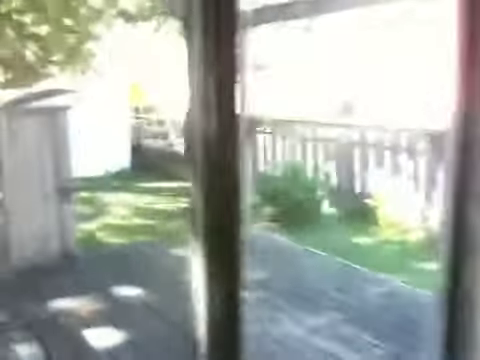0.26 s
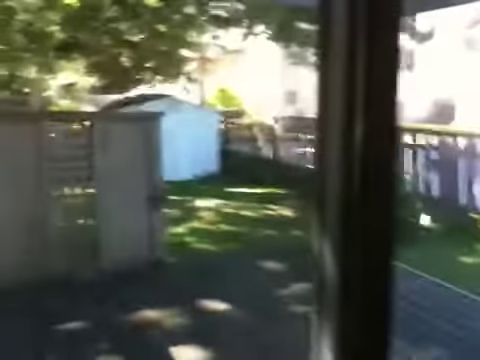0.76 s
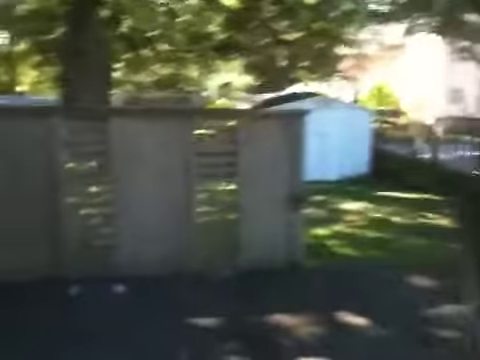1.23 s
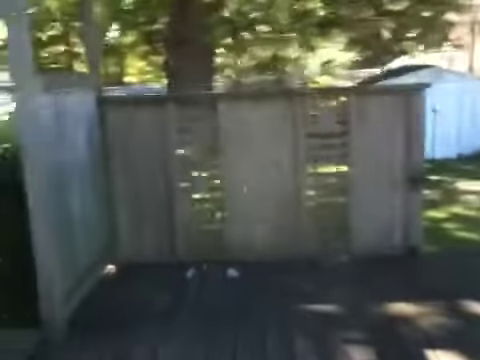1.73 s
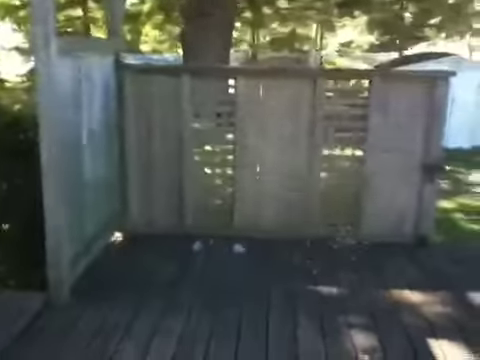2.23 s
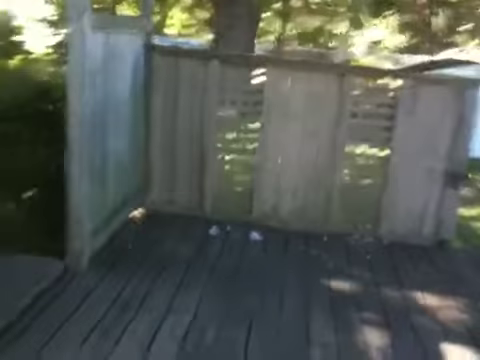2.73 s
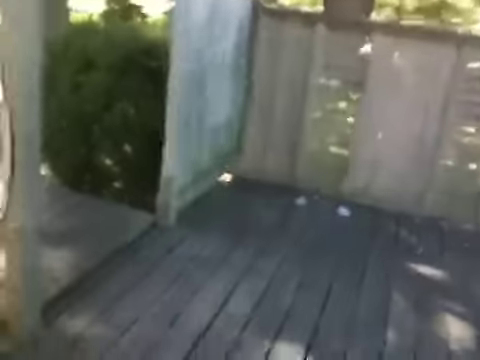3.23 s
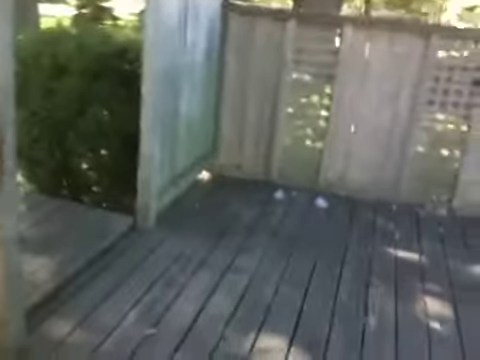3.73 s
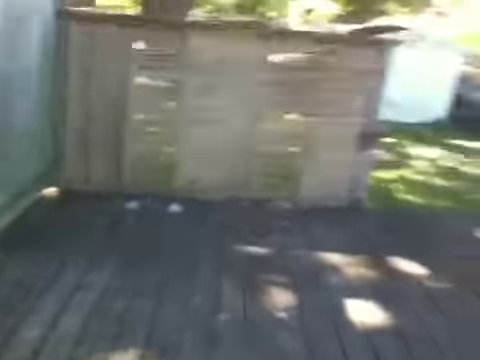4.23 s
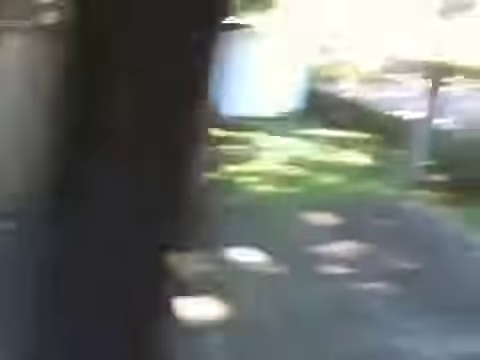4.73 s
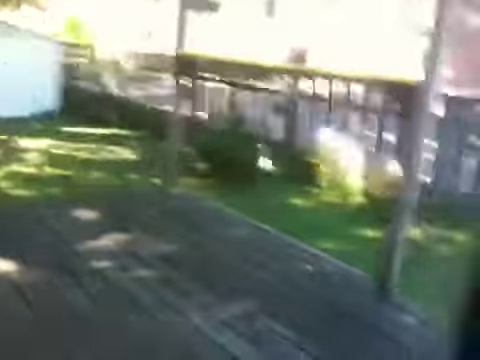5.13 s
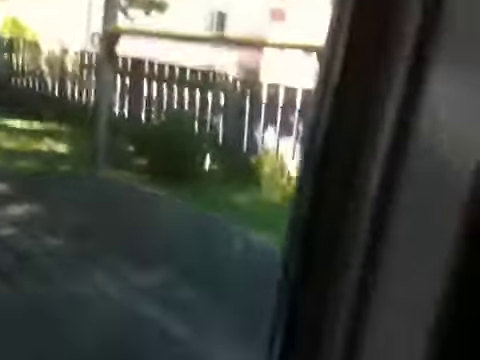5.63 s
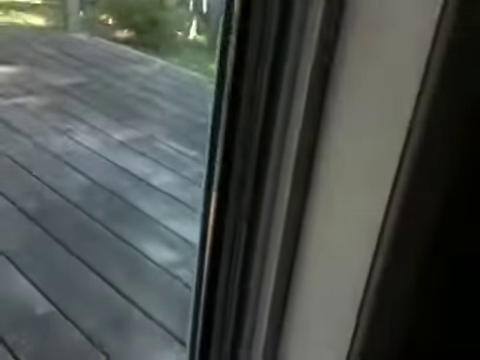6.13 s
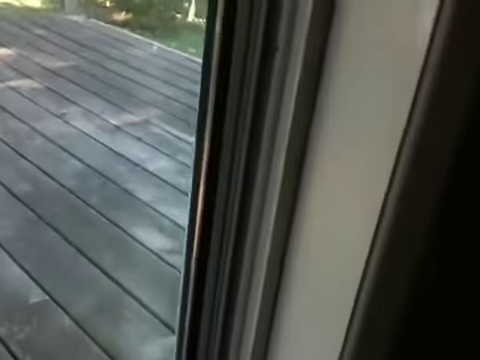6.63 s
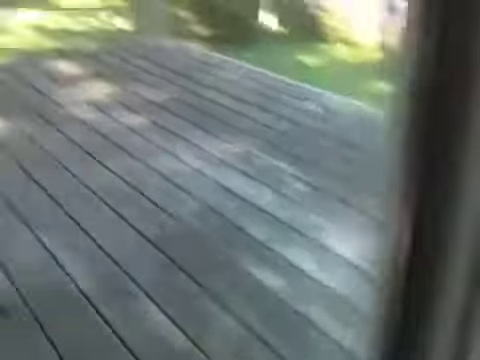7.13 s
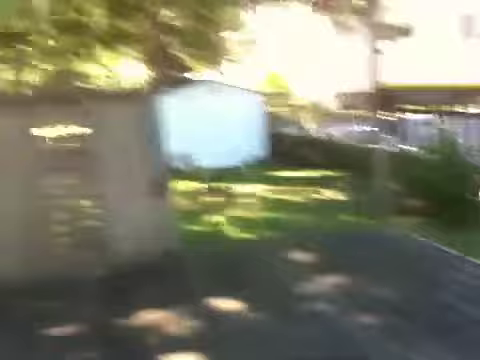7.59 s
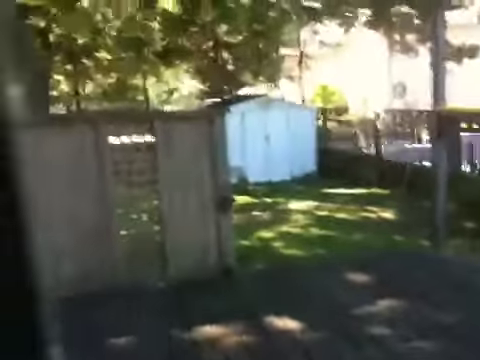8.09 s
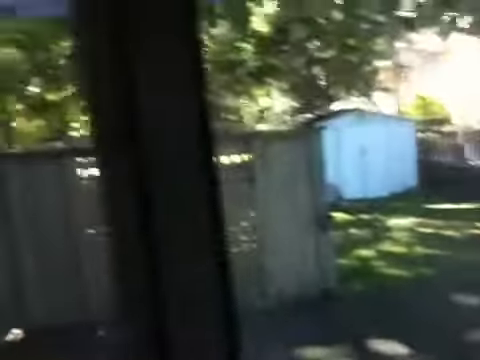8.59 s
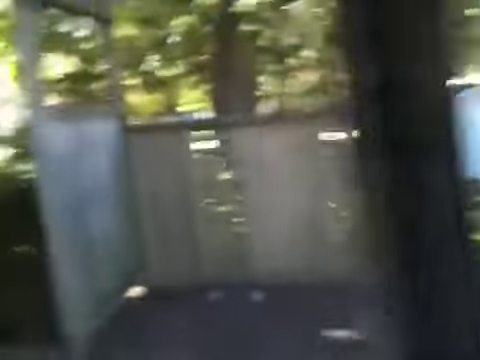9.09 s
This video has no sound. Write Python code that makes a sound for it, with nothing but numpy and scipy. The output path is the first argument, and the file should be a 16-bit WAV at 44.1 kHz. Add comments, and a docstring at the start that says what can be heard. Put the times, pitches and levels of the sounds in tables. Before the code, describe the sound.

A quiet beginning of cloth rustle breaks into clusters of dry clacks and thuds as a glass door's latch and frame are worked. A brief, bright skid of the sash rings its aluminium channel. Things calm to faint taps, then one strong clack rattles. Last, rollers rumble along a dirty track with hiss and two low swells. Close indoor sound with a short room tail.

```python
"""A faint shudder and rustle come first, then the latch and frame of a sliding glass patio door clack.
Filtered noise makes the background, and decaying noise bursts with wandering tones make the contacts.
Damped sagging tones make dull low thuds; the sash scrapes in its aluminium channel by dense random slips.
At the end the door rolls along its gritty track: droning panes, two low swells, crunching grains and hiss.
All is heard close to the microphone, in a small room."""
import sys
import numpy as np
from scipy import signal
from scipy.fft import rfft, irfft, next_fast_len
from scipy.io import wavfile
from scipy.ndimage import uniform_filter1d, map_coordinates

SR = 44100
rng = np.random.default_rng(int(sys.argv[2]) if len(sys.argv) > 2 else 0)


def generate_wav(sig):
    """Save sig (samples, or channels by samples) to the path in sys.argv[1] as 16-bit PCM at SR."""
    pcm = np.round(np.clip(np.atleast_2d(sig).T, -1, 1) * 32767).astype(np.int16)
    wavfile.write(sys.argv[1], SR, pcm)


N = 412335

# Modes of the glass panes. Each row: frequency in Hz, width in Hz, relative level in dB.
PANE_MODES = [(144.8, 9.2, -1.5), (165, 28, 1), (213.8, 9.6, 3), (249, 11, 2), (246, 52, -2),
              (303.7, 11, -6.5), (361.7, 17, -7), (445, 11, -20.5)]
# Resonances of the door frame. Each row: frequency in Hz, width in Hz, relative level in dB.
FRAME_MODES = [(457.6, 6.8, 2), (545, 13, 2.5), (1056, 15, -2.5), (1370, 24, -0.5), (1666, 27, 2),
               (1847, 16, -2), (2265, 21, 1.5), (2466, 18, 4), (3283, 25, -1), (3920, 34, 6), (5570, 60, 2),
               (7380, 150, 3.5)]


def amp(db):
    """Amplitude ratio: twenty decibels are a factor of ten."""
    return 10 ** (np.asarray(db) / 20)


def unit(x):
    """Normalisation: the signal is scaled to rms 1."""
    return x / np.sqrt(np.mean(x ** 2) + 1e-20)


def along(points, hz):
    """Logarithmic pitch scale: (Hz, value) points are joined by lines on a log axis."""
    f, v = np.transpose(points)
    return np.interp(np.log(hz + 1), np.log(f + 1), v)


def curves(rows):
    """Linear interpolation in time: one value per sample for each column after the time."""
    s, *columns = np.transpose(rows)
    return [np.interp(np.arange(N) / SR, s, column) for column in columns]


def noise(size=N):
    """White noise: equal mean power at every frequency."""
    return rng.standard_normal(size)


def wobble(rate):
    """Slow random modulation: a smooth curve through random knots, rate of them a second."""
    knots = noise(int(N * rate / SR) + 4)
    return map_coordinates(knots, [np.arange(N) * rate / SR])


def grains(rate, spread_db):
    """Random impact process: tiny impacts, about rate a second, of unequal size, at rms 1."""
    struck = rng.random(N) < rate / SR
    size = rng.uniform(-1.0, 1, N) * amp(spread_db * np.clip(noise(), -2, 2))
    return unit(struck * size)


def filtered(x, response):
    """Linear filtering: the spectrum is multiplied by a response of frequency."""
    m = next_fast_len(len(x) + SR // 2)
    return irfft(rfft(x, m) * response(np.fft.rfftfreq(m, 1 / SR)), m)[:len(x)]


def coloured(x, spectrum):
    """Spectral shaping: each frequency is weighted by a curve in dB, and the result has rms 1."""
    return unit(filtered(x, lambda hz: amp(along(spectrum, hz))))


def band(x, low_hz, high_hz, order=3):
    """Causal band-pass: only frequencies between two edges pass freely."""
    sos = signal.butter(order, [low_hz, high_hz], "band", fs=SR, output="sos")
    return signal.sosfilt(sos, x)


def resonate(x, modes):
    """Modal superposition: parallel resonators of (Hz, width, dB), alternating in sign."""
    out = np.zeros(len(x))
    for k, (hz, width, db) in enumerate(modes):
        b, a = signal.iirpeak(hz, hz / width, fs=SR)
        out += (-1) ** k * amp(db) * signal.lfilter(b, a, x)
    return out


def patchy(x, depth_db):
    """Local spectral fluctuation: each passing grain or fold favours its own frequencies for a moment."""
    z = signal.stft(x, nperseg=512)[2]
    field = uniform_filter1d(rng.standard_normal(z.shape), size=5, axis=0)
    field = uniform_filter1d(field, size=5, axis=1)
    return unit(signal.istft(z * amp(depth_db * unit(field)), nperseg=512)[1][:N])


def add(track, s, sound):
    """Linear superposition: a sound is mixed in at time s."""
    part = track[round(s * SR):][:len(sound)]
    part += sound[:len(part)]


def room(x):
    """Diffuse reverberation: convolution with decaying noise whose treble dies first."""
    # Decay of the small room. Each row: frequency in Hz, t60 in seconds.
    room_decay = [(150, 0.33), (700, 0.2), (3000, 0.19), (12000, 0.16)]
    hz, t, z = signal.stft(noise(SR // 2), SR, nperseg=256)
    t60 = along(room_decay, hz)[:, None]
    tail = signal.istft(z * amp(-60 * t / t60), SR, nperseg=256)[1]
    return signal.fftconvolve(x, tail / np.linalg.norm(tail))[:N]


def glass(spectrum, pane_db):
    """Forced vibration: low noise sets the pane modes droning, at rms 1."""
    drive = coloured(noise(), spectrum)
    return unit(drive + amp(pane_db) * unit(resonate(noise(), PANE_MODES)))


def ticks(rate, t60=0.044):
    """Impulsive excitation: small stray clicks ring the frame modes, at rms 1."""
    t = np.arange(SR // 10) / SR
    click = band(noise(len(t)), 900, 5700, order=2) * amp(-60 * t / t60)
    clicks = signal.fftconvolve(grains(rate, spread_db=6.0), click)[:N]
    return unit(clicks + resonate(clicks, FRAME_MODES))


def handling(shudder_db=-1.5, tick_db=-81, palm_db=-57.5):
    """Friction and forced vibration: the door shudders and ticks, clothes rustle, a palm brushes the frame."""
    # Course of the quiet background.
    # Each row: time in seconds, relative shudder level in dB, relative rustle level in dB.
    background = [(0, -76, -68), (.3, -68, -66.5), (.65, -75.5, -70), (1.15, -65.5, -67.5),
                  (1.45, -59.5, -54.5), (1.8, -51.5, -59), (2.2, -58, -71.5), (2.55, -67.5, -68),
                  (3.05, -46.5, -56.5), (3.3, -56.5, -63), (3.55, -43, -55), (3.97, -70.5, -70.5),
                  (4.25, -73, -71.5), (4.75, -63, -64.5), (4.87, -67, -67.5), (5.3, -63.5, -58.5),
                  (6, -75, -66.5), (6.5, -72, -66.5), (7.5, -71.5, -64.5), (8.3, -70.5, -67.5)]
    # Spectra of the shudder, rustle and palm. Each row: frequency in Hz, relative density in dB per Hz.
    shudder_spectrum = [(21, -65), (35, -22), (86, -18.5), (134, -5.5), (194, -7), (231, 1.5), (325, -5.5),
                        (382, -10.5), (475, -25), (900, -23.5), (1170, -59), (1980, -120)]
    rustle_spectrum = [(290, -15.5), (500, 1), (595, -3.5), (1030, -3.5), (1480, -1.5), (1670, -3.5),
                       (1930, -1.5), (3250, -5), (6510, -3.5), (8960, -13), (15100, -23), (16000, -15)]
    palm_spectrum = [(500, -28), (1500, -6.5), (5900, 5), (9000, -3.5), (13000, -5.5), (16000, -7.5)]
    shudder_level, rustle_level = curves(background)
    shudder_gain = amp(shudder_db + shudder_level + 2.7 * wobble(12))
    shudder = shudder_gain * glass(shudder_spectrum, pane_db=-2.5)
    fibres = coloured(grains(rate=8300, spread_db=0.5), rustle_spectrum)
    rustle = amp(rustle_level + 1.4 * wobble(27)) * patchy(fibres, depth_db=2.0)
    # the palm's slide is loudest at 5.763 s and at half amplitude 0.18 s to either side
    stroke = 1 / (1 + ((np.arange(N) / SR - 5.763) / 0.18) ** 2)
    palm = amp(palm_db) * stroke * coloured(noise(), palm_spectrum)
    return shudder + rustle + palm + amp(tick_db) * ticks(rate=10)


def squeaks(width=0.12):
    """Stick-slip friction: each brief squeak is a swell of noise in a narrow band."""
    # Faint squeaks of the settling sash.
    # Each row: start in seconds, level in dB, centre in Hz, time to the peak in seconds.
    squeak_events = [(2.128, -68, 1420, 0.0089), (2.2, -67, 1460, .012), (2.222, -65, 1420, 0.011),
                     (2.265, -66, 1480, 0.0055), (2.342, -62, 1500, .006), (2.42, -64, 1420, 0.0062),
                     (2.495, -71, 1440, .009)]
    out, t = np.zeros(N), np.arange(SR // 5) / SR
    for s, db, hz, rise in squeak_events:
        swell = t / rise * np.exp(1 - t / rise)
        squeal = unit(band(noise(len(t)), hz * (1 - width), hz * (1 + width)))
        add(out, s, amp(db) * swell * squeal)
    return out


def thuds_and_swells(level_db=-1, rise=0.02, t60=0.15, noise_db=-5, sag=.12):
    """Damped vibration: a low tone swells, then sags in pitch as it fades, amid dull noise."""
    # Dull low thuds of the door, and two low swells (the last rows) in the rumble as it rolls.
    # Each row: start in seconds, relative level in dB, nominal pitch in Hz.
    low_events = [(1.641, -23.5, 223.5), (1.673, -37, 298), (1.734, -43, 292), (1.967, -34, 138),
                  (2.154, -47, 234), (2.628, -42.5, 378), (2.848, -35, 187), (3.005, -33, 172),
                  (3.513, -33, 105), (3.692, -34, 249), (3.79, -41.5, 231), (3.515, -27, 187.5),
                  (4.334, -47, 192), (4.641, -46, 434), (4.679, -41.5, 302), (5.04, -43.5, 275),
                  (6.575, -20, 487), (6.576, -25, 184), (6.644, -33, 400), (6.7, -44, 328),
                  (7.102, -41, 638), (7.272, -40, 509), (7.322, -47, 97), (7.674, -40, 396),
                  (7.772, -45.5, 192), (7.913, -43, 193), (8.075, -43.5, 201), (8.77, -21, 277),
                  (8.955, -22.5, 296)]
    out, t = np.zeros(N), np.arange(SR // 2) / SR
    swing = (1 - np.exp(-t / rise)) * amp(-60 * t / t60)
    # the pitch falls from sag / 2 above nominal to sag / 2 below it
    bent_time = np.cumsum(1 + sag * (np.exp(-np.pi * t / t60) - .5)) / SR
    for s, db, hz in low_events:
        tone = np.sin(2 * np.pi * hz * bent_time)
        dull_noise = unit(band(noise(len(t)), 140, 440))
        add(out, s, amp(db + level_db) * swing * (tone + amp(noise_db) * dull_noise))
    return out


def scrapes(rise=0.001, release_t60=0.18, bite_width=0.25,
            room_db=-9, rasp_db=-1, bite_db=-4, metal_db=-3, fizz_db=-17):
    """Sliding friction: dense slips grind on dirt, bite at a pitch of their own and ring the channel."""
    # Scrapes of the sash. Each row: start in seconds, relative level of the dull grinding in dB,
    # relative level of the bright metal in dB, length in seconds, pitch in Hz at which its edge bites.
    scrape_events = [(0.763, -65.5, -73, 0.092, 2500), (1.358, -55, -60, 0.048, 6000),
                     (1.498, -48, -57, 0.12, 3680), (1.628, -41, -45, .014, 3700),
                     (1.838, -43, -64, 0.038, 3800), (2.839, -48, -43.5, .01, 3400),
                     (2.853, -36.5, -45, 0.018, 1300), (2.995, -38.5, -26.5, 0.02, 5040),
                     (3.013, -48, -31, 0.019, 6400), (3.047, -54, -32, 0.01, 6400),
                     (3.086, -52, -50, 0.073, 5500), (3.201, -51, -49, 0.025, 2700),
                     (3.37, -51, -69, 0.096, 2000), (3.488, -44.5, -48, 0.028, 1900),
                     (4.326, -66, -66.5, 0.037, 1300), (4.455, -50.5, -36.5, 0.02, 5100),
                     (4.498, -58.5, -54.5, 0.035, 5450), (4.895, -62, -74, 0.025, 2000),
                     (5.096, -54, -53.5, 0.0065, 2400), (5.107, -53, -36, 0.0089, 2490),
                     (5.137, -64, -43, 0.02, 2300), (5.992, -54, -72, 0.013, 1600),
                     (6.592, -51.5, -54, 0.035, 1800), (6.72, -52, -50.5, 0.029, 4200),
                     (8.181, -63, -59.5, 0.23, 2500), (8.486, -45, -49, 0.018, 2400),
                     (8.6, -46, -51, 0.082, 2500), (8.715, -44, -46.5, .025, 3020),
                     (8.848, -45.5, -43, 0.018, 3800), (8.918, -51, -44, .012, 4770),
                     (9.016, -43, -43, 0.011, 2690), (9.286, -48, -49, .015, 2400)]
    # Modes of the aluminium channel. Each row: frequency in Hz, width in Hz, relative level in dB.
    channel_modes = [(2030, 60, -13), (4217, 35, -2), (4356, 35, -1), (4550, 40, -1), (4842, 35, -1),
                     (5585, 35, 1), (5857, 35, -4), (6096, 30, 4), (6340, 35, -2), (6445, 35, -3),
                     (6990, 35, -5), (7187, 45, -5), (7500, 35, -8), (7616, 35, -8)]
    # Spectra of the bright rasp and dull grinding. Each row: frequency in Hz, relative density in dB per Hz.
    rasp_spectrum = [(120, -36.5), (200, -11), (749, -24.5), (1160, -4.5), (1500, -8), (2090, -3),
                     (2420, -7), (4430, 1), (5330, 0), (6280, -1.5), (8000, -7), (9230, -18.5),
                     (16000, -39.5)]
    grind_spectrum = [(40, -44), (150, -10), (350, -5), (800, -4.5), (1200, -1), (1900, -2.5), (2500, -4.5),
                      (3400, -3.5), (5000, -12), (7500, -18.5), (10000, -29), (16000, -36.5)]
    t = np.arange(SR // 2) / SR
    dull, bright, bite = np.zeros((3, N))
    for s, dull_db, bright_db, length, bite_hz in scrape_events:
        stroke = amp(-60 * np.maximum(t - length, 0) / release_t60) * (1 - np.exp(-t / rise))
        edge = unit(band(noise(len(t)), bite_hz / (1 + bite_width), bite_hz * (1 + bite_width)))
        add(dull, s, stroke * amp(dull_db))
        add(bright, s, stroke * amp(bright_db))
        add(bite, s, stroke * amp(bright_db) * edge)
    grip = unit(amp(2.2 * wobble(330)))
    slips = grip * grains(rate=15000, spread_db=0)
    chatter = unit(grains(rate=12000, spread_db=2) * amp(2.2 * wobble(130)))
    grind = dull * patchy(coloured(chatter, grind_spectrum), depth_db=2.5)
    rasp = bright * coloured(slips, rasp_spectrum)
    # the channel's ring rises more steeply than the force of a skid
    force = bright / bright.max()
    ring = resonate(noise() * force ** 1.5, channel_modes)
    metal = bright.max() * ring / np.std(resonate(noise(), channel_modes))
    # only the hardest skid reaches far into the treble
    fizz = bright * force * unit(band(slips, 7400, 15000))
    dry = grind + amp(rasp_db) * rasp + amp(bite_db) * grip * bite
    dry += amp(metal_db) * metal + amp(fizz_db) * fizz
    return dry + amp(room_db) * room(dry)


def crumbs(rate, centre_hz=2600, octaves=0.793, cycles=14, spread_db=3):
    """Brittle fracture: larger crumbs crack under the rollers as short damped tones, at rms 1."""
    t = np.arange(SR // 50) / SR
    when, pitch, size = rng.random((int(rate * N / SR), 3)).T[:, :, None]
    # octaves is the standard deviation of the evenly spread pitches
    hz = centre_hz * 2 ** (octaves * np.sqrt(3) * (2 * pitch - 1))
    strength = amp(spread_db * np.minimum(-np.log(1 - size), np.pi))
    # each tone falls 20 dB in the given number of cycles
    cracks = strength * np.sin(2 * np.pi * hz * t) * amp(-20 * hz * t / cycles)
    at = (when * N).astype(int) + np.arange(len(t))
    return unit(np.bincount(at.ravel(), cracks.ravel(), N)[:N])


def rolling(rumble_db=-36.5, grit_db=-42, room_db=-9, hum_db=-40, surge_db=0.65, hiss_db=-53,
            crumb_db=-5, drone_full_at=0.59):
    """Rolling contact noise: rollers shake the panes and crunch over dirt, all growing with speed."""
    # The rolling door. Each row: time in seconds, speed as a share of full speed.
    speed_course = [(8.2, 0.026), (8.36, 0.037), (8.41, 0.36), (8.62, 0.87), (8.78, 0.99), (9.03, 0.95),
                    (9.19, 0.7), (9.3, 0.81), (9.35, 0.57)]
    # Modes rung by the rollers. Each row: frequency in Hz, width in Hz, relative level in dB.
    roller_modes = [(293, 18, -2), (372, 18, -4.5), (430, 35, -6)]
    # Spectra of the rumble and grit. Each row: frequency in Hz, relative density in dB per Hz.
    rumble_spectrum = [(21, -69), (35, -27), (108, -10), (138, -2), (181, -8), (210, 10), (238, 0.5),
                       (291, 3), (325, 0.5), (456, -5.5), (599, -16.5), (900, -29), (1170, -33),
                       (1980, -120)]
    grit_spectrum = [(320, -18), (550, 2), (599, -1), (740, 3.5), (864, -3), (953, 4), (1260, -2),
                     (1850, 2.5), (1980, -1), (2950, 0), (3910, -6.5), (6220, -9.5), (15100, -35.5),
                     (16000, -49)]
    moving = np.arange(N) / SR > speed_course[0][0]
    speed = curves(speed_course)[0] * moving
    bumpy = wobble(45)
    # the drone levels off around drone_full_at, a share of full speed
    underway = np.tanh(speed / drone_full_at)
    drone = underway * unit(glass(rumble_spectrum, pane_db=-1.5) * amp(0.84 * bumpy))
    # the faster the door rolls, the higher its rumble reaches
    upper_rumble = unit(band(noise(), 250, 545)) + unit(resonate(noise(), roller_modes))
    hum = speed ** 2 * unit(upper_rumble)
    dirt = grains(rate=9000, spread_db=2.5) * amp(.6 * bumpy + 1.4 * wobble(110))
    crunch = patchy(coloured(dirt, grit_spectrum), depth_db=1.8)
    # dirt lies unevenly along the track, so the crunch comes in small surges
    surges = amp(surge_db * wobble(15))
    grit = speed ** 0.94 * surges * (crunch + amp(crumb_db) * crumbs(rate=450))
    grit_in_room = grit + amp(room_db) * room(grit)
    # a bright hiss runs along with the rolling, its level fluctuating irregularly
    fluctuation = amp(4 * np.clip(wobble(28), -1.5, 1.5))
    hiss = speed ** 2 * unit(fluctuation * band(noise(), 3300, 7100))
    low = amp(rumble_db) * drone + amp(hum_db) * hum
    return low + amp(grit_db) * grit_in_room + amp(hiss_db) * hiss


def contacts(level_db=-1.5, pane_db=7, boom_rise=0.007, strike_rise=0.00056, ring_width=0.014,
             chatter_db=2.5, push_db=-24.5):
    """Impact excitation: a chattering strike with a brief ring, carried on by panes, frame and room."""
    # Hard contacts of latch and frame. Each row: start in seconds, relative strength in dB,
    # hardness in dB per octave, then boom and tail in dB, ring in Hz, ring in dB.
    # Boom, tail and ring levels are relative to the strength.
    contact_events = [(1.019, -65.5, 4.5, -14, -19, 5400, 2), (1.213, -57, 4.5, -15, -25, 1080, 2.5),
                      (1.243, -35, 2.5, -13.5, -13, 4440, -3), (1.344, -34, -0.5, -12, -14, 1060, -7),
                      (1.473, -60, 7.5, -20.5, -20, 7930, 8), (1.498, -43, 1.5, -9.5, -11, 3420, -0.5),
                      (1.525, -43.5, -0.5, -9.5, -23.5, 3120, 19.5),
                      (1.54, -38, -1.5, -12.5, -7.5, 3650, 15), (1.583, -53, -1, -13.5, -9, 3650, 11.5),
                      (1.599, -33, 0.5, -8.5, -2.5, 3480, 1.5), (1.615, -24.5, 1.2, -16.5, -10.5, 997, 4.5),
                      (1.637, -40.5, -1, -0.5, 2, 1093, 2.5), (1.845, -35.5, 0, -6.5, -7, 3770, 0.5),
                      (1.863, -43, 3, -0.5, -11, 1452, 7.5), (1.879, -40, -4, -2, -11, 1140, 9.5),
                      (2.046, -60, -2.5, -20, -13, 2520, 12), (2.438, -68, 2.5, -2, -17, 4420, 4),
                      (2.599, -66, -4, -2, -8.5, 1890, 1), (2.875, -30, 3, -12, -17, 1117, 8.5),
                      (2.889, -33, -2, -11.5, -17, 3385, 18), (3.217, -40.5, 1.5, -5, -19, 2700, 30.5),
                      (3.334, -60, -2, -13, -26, 2840, 23), (3.372, -46.5, -2.5, 4.5, -10.5, 870, 1),
                      (3.391, -54.5, -5, 2, 0.5, 2010, 14), (3.424, -45.5, -6, -3.5, -9, 1710, 10),
                      (3.494, -45, -7.5, -1, -2.5, 1850, 12), (3.512, -31.5, 1.5, 0, -18.5, 1585, 9),
                      (3.652, -61, 4.5, -8.5, -14.5, 4100, 5), (5.346, -57, 0.5, -16, -10, 1500, 5),
                      (6.006, -42, -3.5, -13, -10, 1570, 2), (6.028, -60.5, -13.5, -12, -9, 530, 11),
                      (6.126, -46, -7.5, -10.5, -14, 566, 9), (6.204, -59, -0.5, -4, -20, 3000, 7),
                      (6.256, -53.5, -6, -13, -4.5, 1550, 0), (6.269, -44, -0.5, -17, -23, 1480, 7),
                      (6.355, -45.5, .3, -16.5, -27, 1490, 13), (6.441, -53.5, -2, -7.5, -21, 1480, 8),
                      (6.575, -23.5, -2, -17, -19.5, 1460, 20.5),
                      (6.577, -31, -0.5, -16.5, -14.5, 2095, 15),
                      (6.587, -33, -2.5, -15.5, -11.5, 1380, 9.5), (6.642, -40.5, -3.5, -8, -5, 2480, 15),
                      (6.648, -42, -3, -11, -9, 2430, 17), (6.654, -42, -3, -15, -8, 1673, 11),
                      (6.663, -47, -2.5, -7.5, -7.5, 2560, 8), (6.69, -48.5, -1, -8, -4, 3400, 2),
                      (6.757, -42, -1, -21, -16, 3250, 6), (6.907, -61, 5.5, -22, -1.5, 5860, 23),
                      (7.054, -62.5, 3.5, -18, -12, 1640, 10), (7.102, -33.5, 3.5, -15.5, -10, 1595, 2),
                      (7.121, -45.5, 3, -13, -6, 3980, 1), (7.149, -49.5, 2.5, -14, -4.5, 3840, 8),
                      (7.241, -38.5, 2.5, -24, -10, 4040, 0.5), (7.271, -48, 3, -21, -8, 3830, 10),
                      (7.319, -48, 2, -9.5, 5, 1746, -8), (7.745, -62.5, 0, -8, -20, 1720, 5.5),
                      (8.066, -58.5, -4.5, 4, -17, 1310, 9), (8.164, -42.5, -3, -12, -20, 2670, 6.5),
                      (8.301, -56, 2, -13, -9, 1396, 13), (8.323, -55.5, 1, -8, -7, 2680, 1),
                      (8.394, -46, 1, -18, -19, 2810, -2), (8.45, -48, 0.5, -5, -15, 3400, 0)]
    # The upper five parts of a contact. Each row: low edge in Hz, high edge in Hz, relative level in dB,
    # t60 of the strike in seconds, t60 of the tail in seconds.
    strike_parts = [(322, 896, -10.5, 0.07, 0.48), (830, 2030, -2.5, 0.051, 0.24),
                    (2220, 4750, 0.5, 0.029, 0.17), (5030, 7860, -4, 0.026, 0.21),
                    (8200, 13500, -17, 0.037, 0.095)]
    pivot_hz = 1980  # a harder contact is louder above this and softer below
    crack_db, crack_t60 = 0.5, 0.008  # the first instant of a contact that does not rattle
    # t60 of a ring as strong as its strike, and how much sooner a stronger one is spent
    equal_ring_t60, ring_damping = 0.072, 0.66
    # a loose, rattling contact keeps its ring going, up to a limit
    ring_tail_db, ring_tail_t60, ring_limit_db = -4, 0.29, 9
    twin_ratio, twin_db = 1.05, -5  # a second, weaker mode above each ring
    out, t = np.zeros(N), np.arange(SR // 2) / SR
    onset, first_cycles = t < .012, t < .035
    looseness = amp(chatter_db * wobble(220))
    for s, db, hardness, boom_db, tail_db, ring_hz, ring_db in contact_events:
        rattle = looseness[round(s * SR):][:len(t)]

        def burst(t60, tail_t60, crack=0):
            """Two-stage decay: noise fades as a strike and as a slower tail."""
            decay = amp(-60 * t / t60) + amp(tail_db - 60 * t / tail_t60)
            return noise(len(t)) * (crack + rattle * decay)

        # the whole sash is pushed; its heavy glass takes a few cycles to start swinging
        shove = burst(0.035, 0.23)
        swing = 1 - np.exp(-t / boom_rise)
        push = band(shove, 35, 110, order=1) * swing
        boom = (band(shove, 103, 358) + amp(pane_db) * resonate(shove, PANE_MODES)) * swing
        low = amp(boom_db) * boom / np.std(boom[first_cycles])
        # the deepest push follows the boom only in part
        low += amp(push_db + 0.22 * boom_db) * push / np.std(push[first_cycles])
        # a clean contact opens with a crack; hardness tilts the strike towards the treble
        crack = max(1 - amp(tail_db), 0) * amp(crack_db - 60 * t / crack_t60)
        strike = np.zeros(len(t))
        for low_hz, high_hz, part_db, t60, tail_t60 in strike_parts:
            part = band(burst(t60, tail_t60, crack), low_hz, high_hz)
            octaves = np.log2(np.sqrt(low_hz * high_hz) / pivot_hz)
            strike += amp(part_db + hardness * octaves) * part / np.std(part[onset])
        # the struck part sits loosely, so the phase of its ring wanders;
        # ring_width is the resulting line width as a share of the pitch
        wander = np.cumsum(noise(len(t))) * np.sqrt(2 * np.pi * ring_width * ring_hz / SR)
        ring_t60 = equal_ring_t60 * amp(-ring_damping * ring_db)
        lingering_db = tail_db + min(ring_db, ring_limit_db) + ring_tail_db
        fade = amp(ring_db - 60 * t / ring_t60) + amp(lingering_db - 60 * t / ring_tail_t60)
        phase = 2 * np.pi * ring_hz * t
        twin = amp(twin_db) * rattle * np.sin(twin_ratio * phase - wander)
        ring = fade * (np.sin(phase + wander) + twin)
        hit = low + strike + resonate(strike, FRAME_MODES) + ring
        add(out, s, amp(level_db + db) * hit * (1 - np.exp(-t / strike_rise)))
    return out


def scene():
    """Superposition: all of the door's sounds add at one microphone."""
    return (handling() + squeaks() + thuds_and_swells() + scrapes() + rolling() + contacts())[None]


def record(dry, low_cut_hz=70, hiss_db=-77, top_hz=16050):
    """Band limitation: a small microphone has thin bass, faint hiss and nothing above its top."""
    high_pass = signal.butter(1, low_cut_hz, "high", fs=SR, output="sos")
    thin = signal.sosfilt(high_pass, dry + amp(hiss_db) * noise())
    return np.array([filtered(x, lambda hz: hz < top_hz) for x in thin])


dry = scene()
out = record(dry)
generate_wav(out)
```